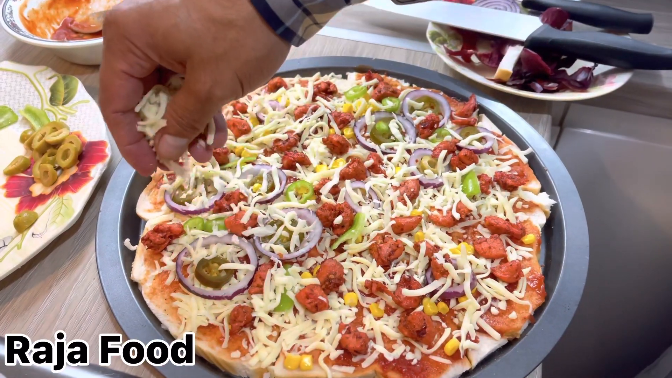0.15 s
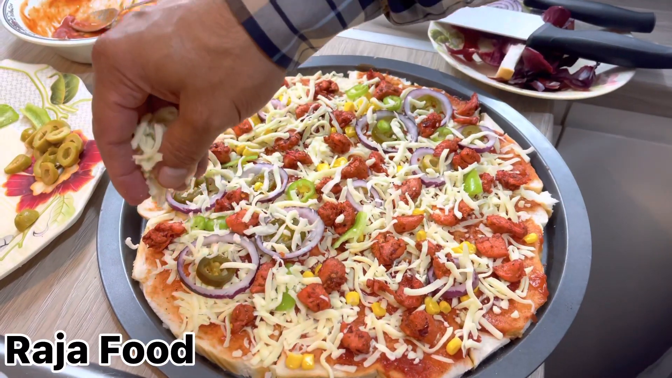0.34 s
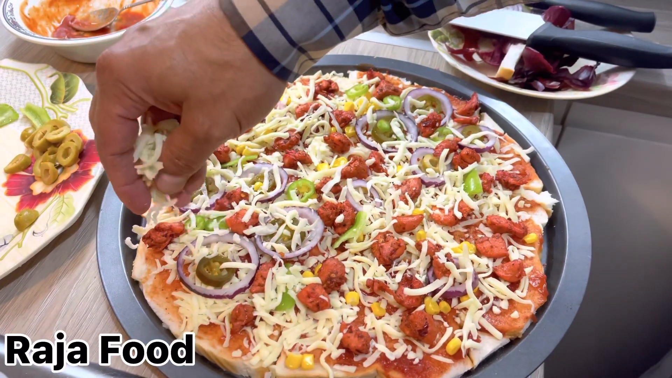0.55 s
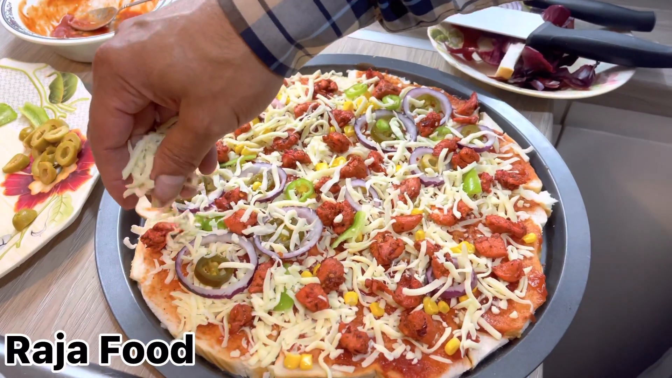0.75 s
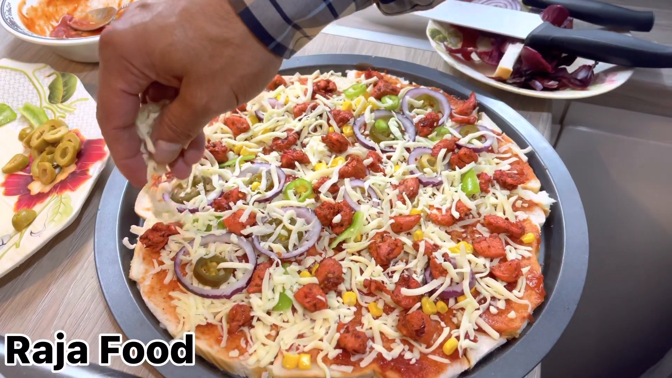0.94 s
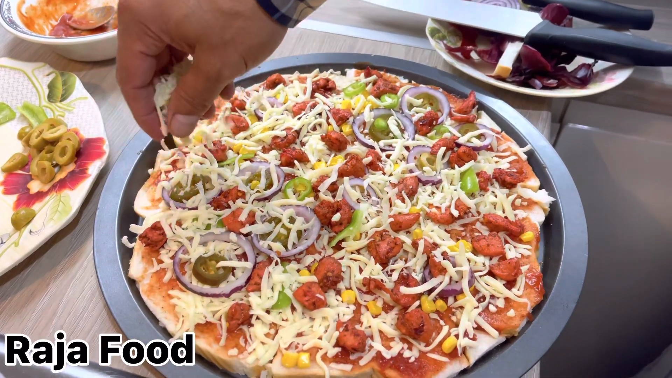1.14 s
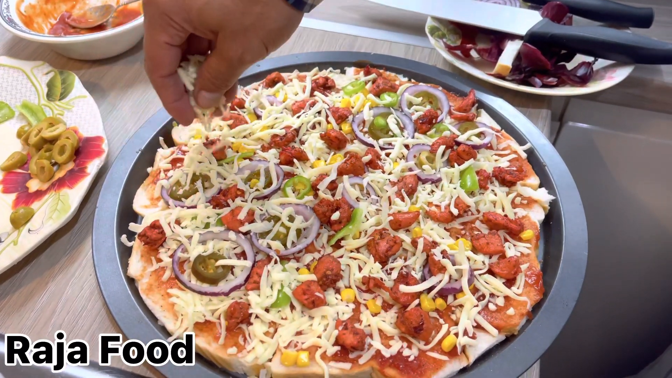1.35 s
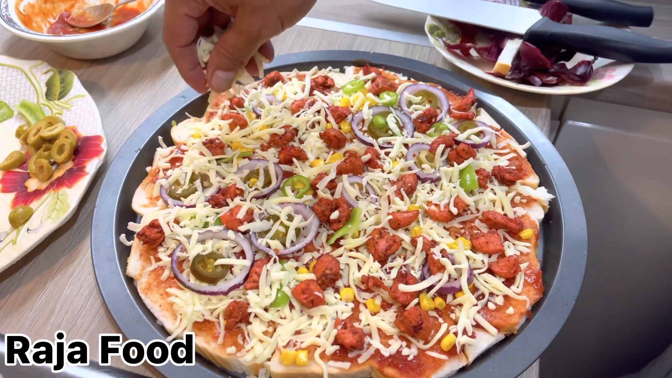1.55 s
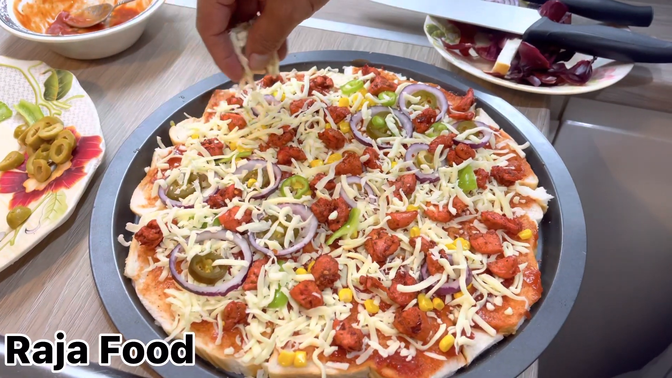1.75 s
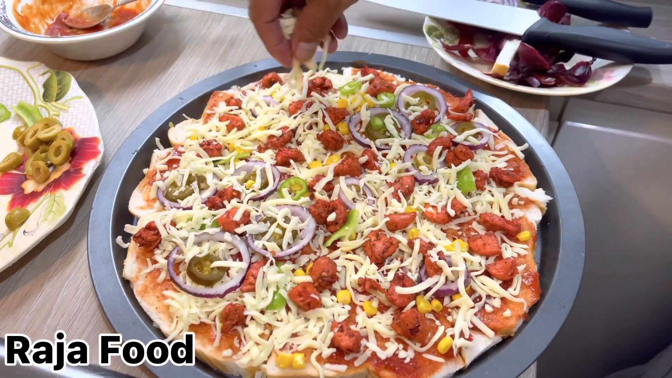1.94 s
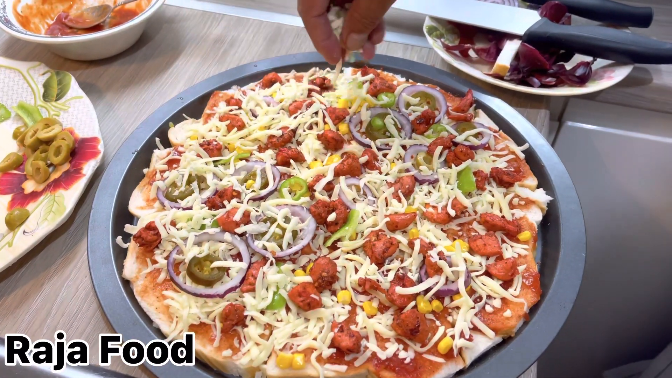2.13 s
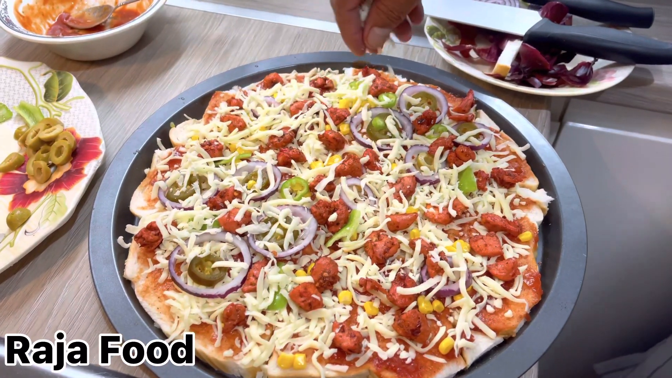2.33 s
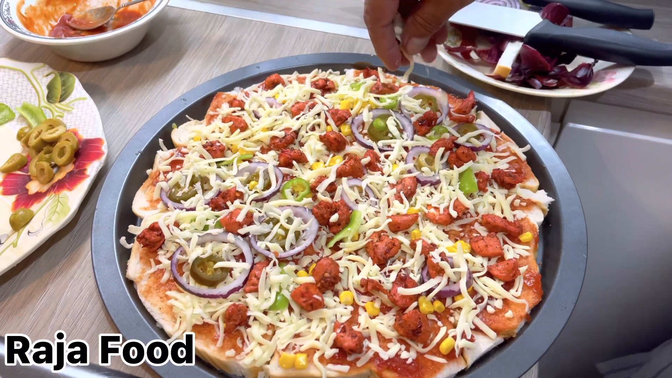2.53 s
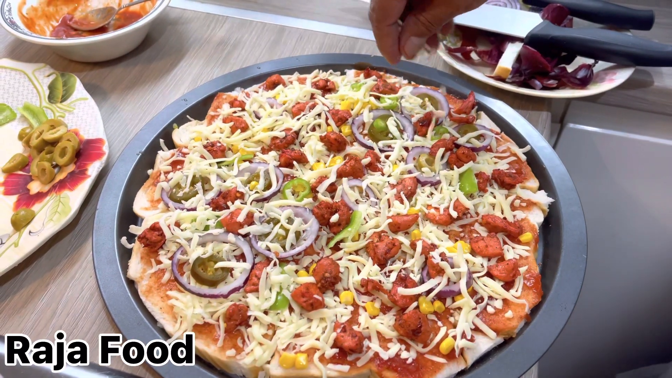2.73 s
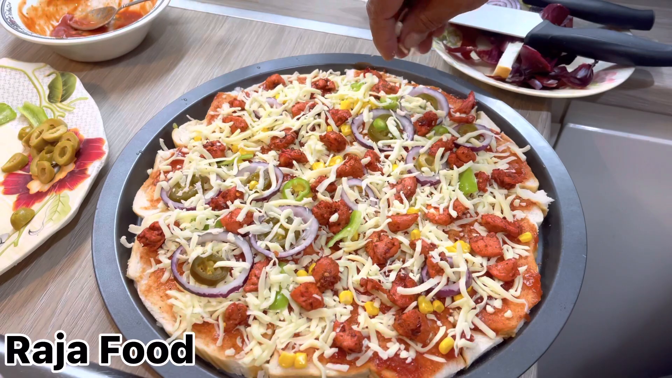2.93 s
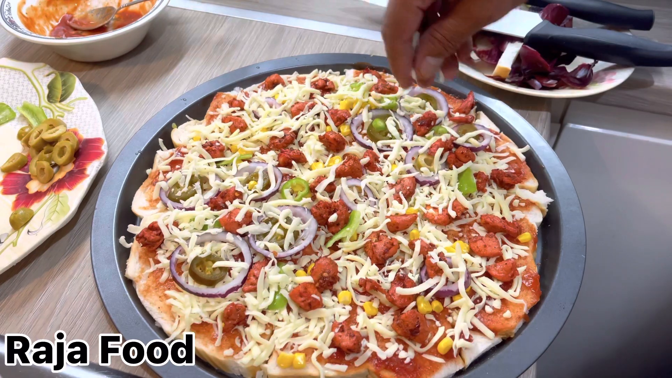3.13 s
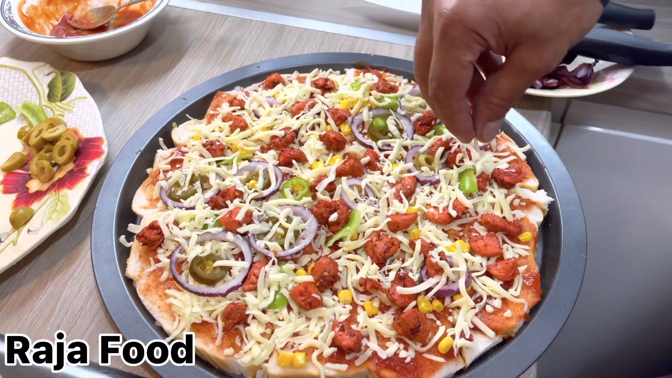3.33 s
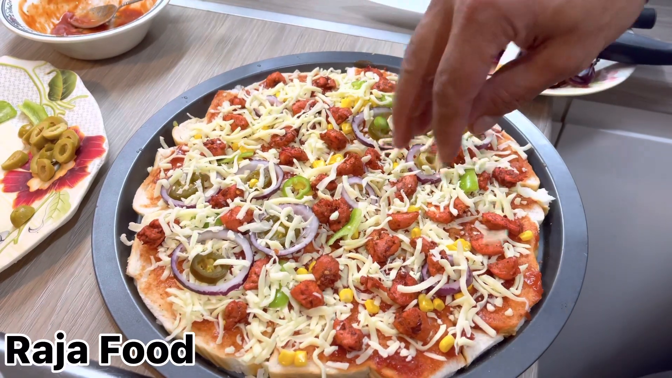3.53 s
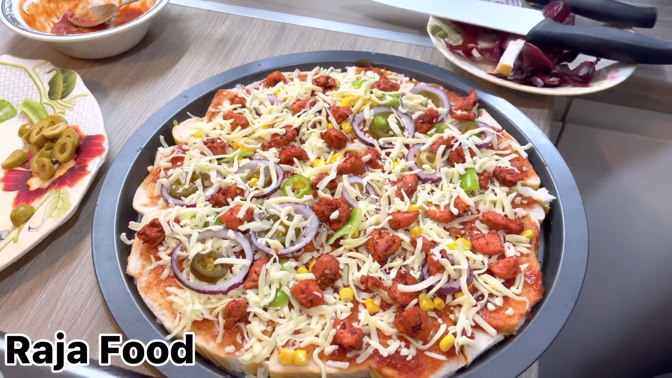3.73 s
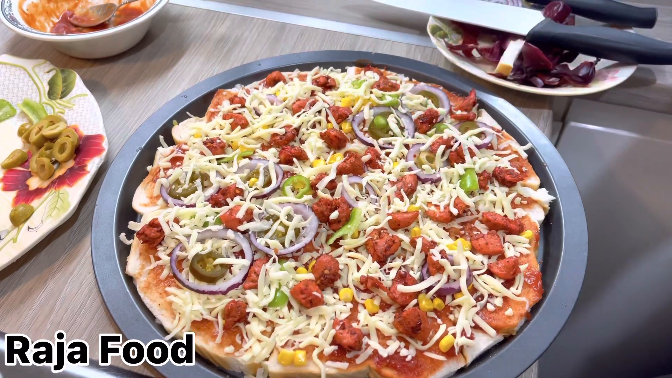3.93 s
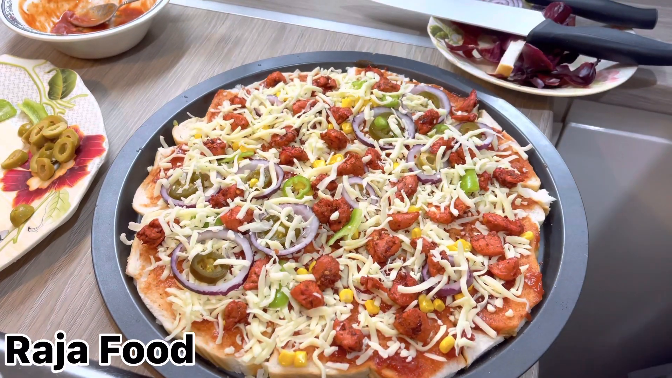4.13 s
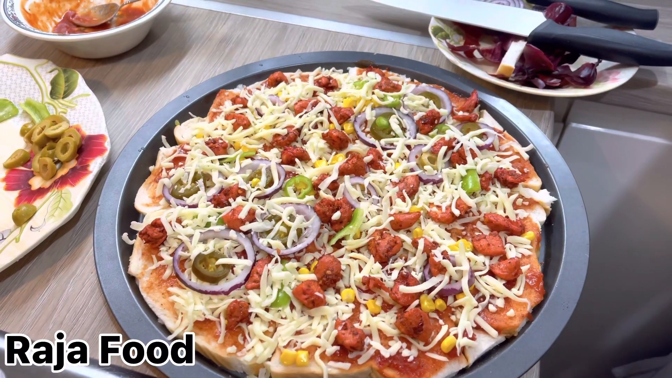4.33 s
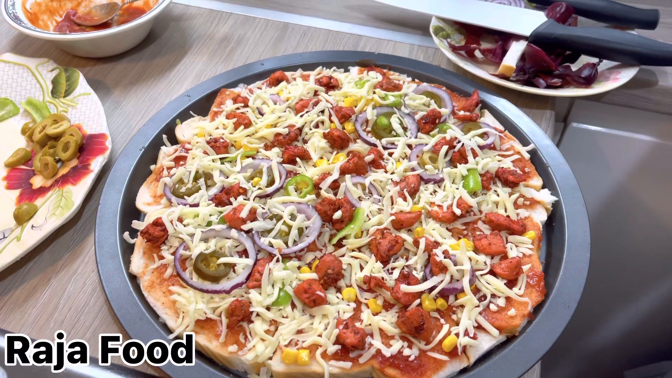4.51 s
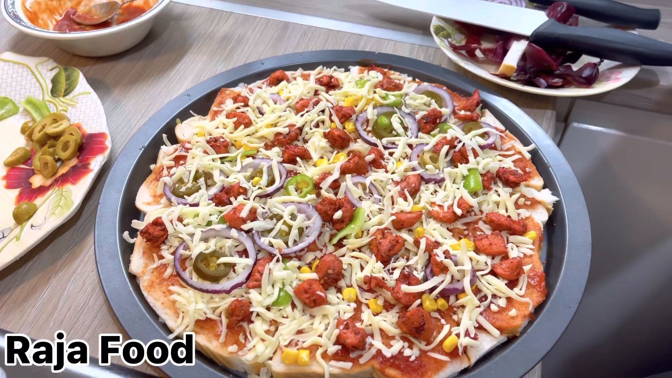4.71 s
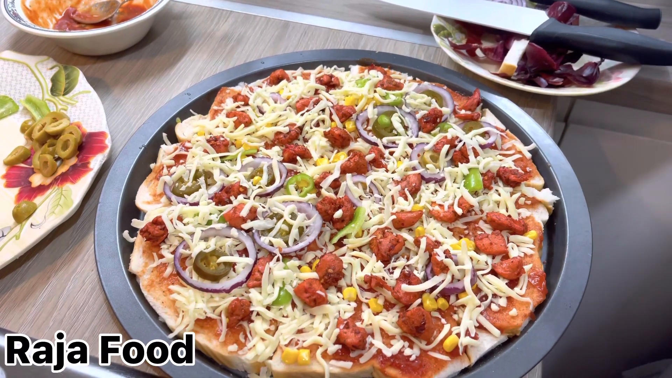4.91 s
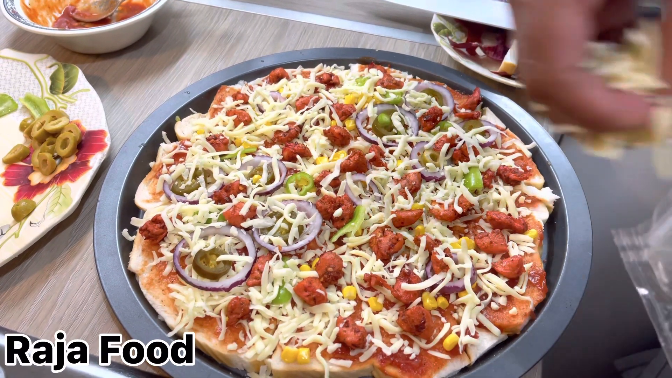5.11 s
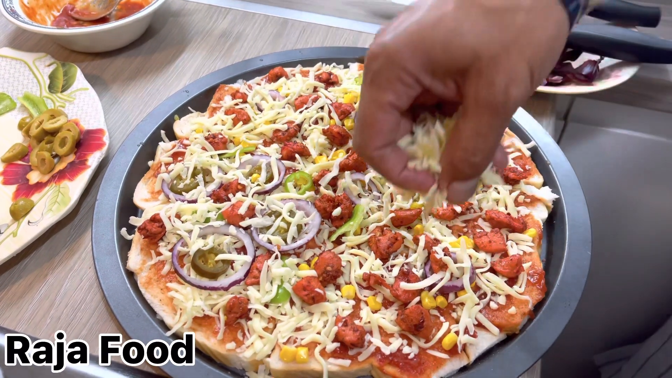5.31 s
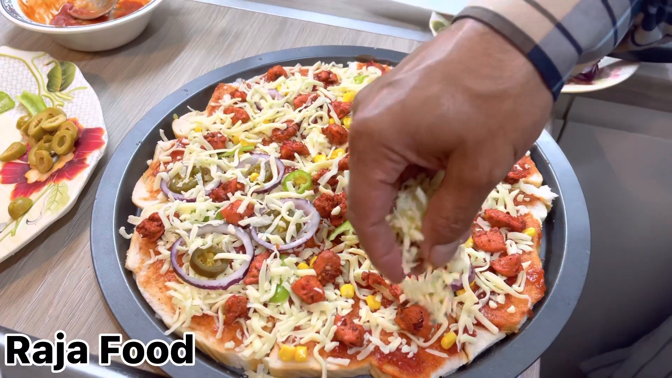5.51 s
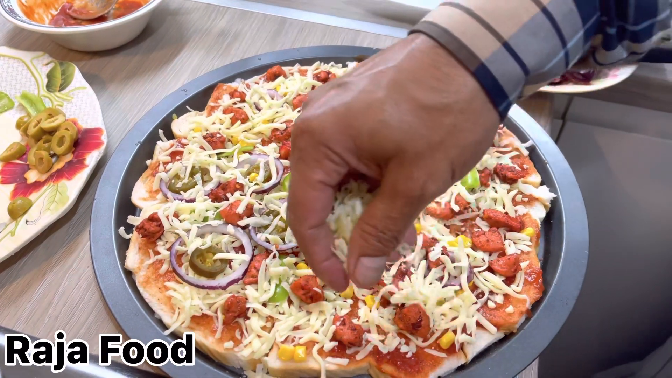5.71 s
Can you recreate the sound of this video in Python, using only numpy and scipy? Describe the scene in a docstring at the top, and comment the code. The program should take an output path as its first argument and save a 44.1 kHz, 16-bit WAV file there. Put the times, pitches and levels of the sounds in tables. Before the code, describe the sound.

Nearly quiet at first: low mains-like hum, faint skin friction, tiny sticky ticks and small dull pats of cheese on toppings. Just before four seconds a crisp plastic bag erupts close by, crackling and snapping with shifting cheese inside and soft bumps beneath, strongest at the start and thinning later. It stops abruptly, leaving a soft cloth rustle and a last small pat. Short indoor reflections, near stereo microphones.

```python
"""In a small kitchen where a fridge hums, grated cheese is scattered over a pizza.
Clumps pat softly onto the toppings: filtered bursts of clicks excite resonances of the loaded tray.
The hand digs into a crinkling plastic bag, where many ringing clicks make the film and shifting cheese,
and comes back with a faint swish of sleeve, made of fine-grained friction noise.
A close pair of microphone ports hears it, with room reflections, over hum and room noise."""
import sys
import numpy as np
from scipy import signal
from scipy.fft import rfft, irfft
from scipy.io import wavfile

SR = 44100
rng = np.random.default_rng(int(sys.argv[2]) if len(sys.argv) > 2 else 0)


def generate_wav(signal):
    """Clip the signal to [-1, 1] and save it as 16-bit WAV at the path in sys.argv[1]."""
    frames = np.transpose(np.atleast_2d(signal))
    scaled = np.clip(frames, -1, 1) * 32767
    pcm = np.round(scaled).astype(np.int16)
    wavfile.write(sys.argv[1], SR, pcm)


N = 258426
TIME, HZ = np.arange(N) / SR, np.fft.rfftfreq(N, 1 / SR)  # [s], [Hz]

# Phase between the ports: (frequency [Hz], lead of the left port [rad])
PORT_PHASE = [(0, 0), (300, -.3), (700, -2.35), (1500, -2.4), (2840, -2.9), (4480, -6.1), (5200, -9),
              (6300, -5.9), (8100, -5.9), (9040, -7.4), (10200, -9.4), (11800, -12), (16000, -12.6)]
# Spectrum of crinkling film: (frequency [Hz], relative density [dB per Hz])
FILM_SPECTRUM = [(500, -20), (1200, -3), (2300, -1), (4600, -1), (6500, -3), (9000, -5), (11500, -2),
                 (12600, -12), (14000, -36)]


def pats(pat_db=0, tick_db=0):
    """Impact and adhesion: moist clumps knock the resonant tray; sticky shreds part with a crisp tick."""
    # Clumps landing:
    # (time [s], attack level [dB], tilt [dB/octave], decay constant [s], main click amplitude [0-1])
    landings = [(1.459, -53.5, -0.5, 0.014, 0.34), (1.473, -46.5, 1, 0.0057, 0.92),
                (1.489, -42.5, 3.5, 0.0036, 0.67), (1.8222, -45, -0.5, 0.0035, 0.67),
                (1.832, -54, -2.5, .006, 0.2), (2.596, -54, -6, 0.0047, .3), (3.292, -59, -6.5, .016, .1),
                (5.816, -51.5, 5, 0.0033, 0.57)]
    # Spectrum of a pat: (frequency [Hz], relative density [dB per Hz])
    pat_spectrum = [(120, -15), (330, -3), (520, -3.5), (750, -0.5), (1050, 0), (1500, -9.5), (2200, -7),
                    (3100, -19.5), (4300, -23.5), (9000, -46)]
    # Resonances of the loaded tray: (frequency [Hz], width [Hz], height [dB])
    tray_resonances = [(312, 39, 5.5), (440, 110, 1), (630, 80, 6.5), (815, 110, -3.5), (990, 68, 4),
                       (1190, 74, -3.5), (1396, 45, 7), (1670, 90, 4.5), (2000, 96, 4), (2280, 110, -0.5),
                       (2880, 170, 1)]
    # Sticky shreds and fingers parting:
    # (time [s], attack level [dB], tilt [dB/octave], decay constant [s])
    partings = [(0.447, -75.5, 4, .002), (.979, -73, -1.5, 0.0022), (1.4737, -61, -7, 0.0033),
                (1.488, -36.5, 0, 0.0015), (1.491, -62, 17, 0.00088), (1.8219, -51.5, -0.5, 0.0082),
                (2.402, -68, 18, 0.002), (2.44, -62, -1, 0.0036), (2.51, -67.5, 9, 0.0014),
                (3.07, -62, -4.5, 0.0023), (3.170, -66.5, -4.5, 0.0027), (3.627, -62.5, 5, .0014)]
    # Spectrum of a tick: (frequency [Hz], relative density [dB per Hz])
    tick_spectrum = [(300, -20), (900, 0), (2100, -1), (3000, -3.5), (4300, -3), (6000, 1.5), (8500, -2.5),
                     (11800, 0.5), (14000, -22.5)]

    knocks, ticks = np.zeros((2, N))
    for s, db, brightness, decay, hardness in landings:
        impact = burst(decay, length=4096, main_click=hardness)
        knock = colour(impact, tilted(pat_spectrum, brightness))
        add(knocks, s, struck(knock, db + pat_db))
    for s, db, brightness, decay in partings:
        release = burst(decay, length=4096, main_click=0.414)
        tick = colour(release, tilted(tick_spectrum, brightness))
        add(ticks, s, struck(tick, db + tick_db))
    return ringing(knocks, tray_resonances) + ticks


def rubs(rub_db=-1, arch_power=1.0, flutter_db=2.0, wander_db_per_octave=2.5):
    """Sliding friction: skin and cloth give fine grains whose duller and brighter parts flutter apart."""
    # Fingers rubbing off shreds, and the sleeve sliding:
    # (middle time [s], length [s], level before the arch [dB], mean tilt [dB/octave])
    strokes = [(0.67, .44, -70, -9), (2.532, 0.35, -72.5, 0), (2.717, 0.11, -68, -3.5),
               (2.804, 0.11, -70, -10.5), (3.22, 0.16, -65.5, -12), (3.598, 0.103, -63.5, -7),
               (3.74, 0.2, -68, 4.5), (5.157, .16, -68.5, -2), (5.366, 0.37, -67.5, 3),
               (5.564, 0.45, -69, 1.5)]
    # Spectrum of sliding skin and cloth: (frequency [Hz], relative density [dB per Hz])
    friction_spectrum = [(600, -5), (1500, 2), (4500, -5), (8000, -8.5), (11500, -17), (13500, -28)]

    out = np.zeros(N)
    for side in (-1, 1):  # duller contact, then brighter contact
        grain = grains(per_s=4600, spread_db=5.0) * gain_of(flutter_db * drift(18))
        for middle, length, db, brightness in strokes:
            start = max(middle - length / 2, 0)
            contact = grain[round(start * SR):][:round(length * SR)]
            spectrum = tilted(friction_spectrum, brightness + side * wander_db_per_octave)
            fizz = evened(colour(contact, spectrum))
            arch = (1 - np.linspace(-1, 1, len(fizz)) ** 2) ** arch_power
            add(out, start, gain_of(db + rub_db) * arch * fizz)
    return out / np.sqrt(2)


def digging(crinkle_db=-2.0, shuffle_db=-2.0, clump_db=2, crackle_db=-4.0, crackles_per_s=140):
    """Crackling noise: creases of many sizes click and ring in thin film while cheese shifts inside."""
    # Spectrum of shifting cheese: (frequency [Hz], relative density [dB per Hz])
    cheese_spectrum = [(50, -22), (135, -4), (190, -9), (285, -3), (380, -4), (500, -7), (620, -5),
                       (850, -3), (1080, -2), (1400, -11), (2500, -30)]

    film_level, cheese_level, tilt = grip()
    clumping_db = clump_db * drift(80)
    film = 0
    for hz in np.geomspace(1000, 12000, num=18):
        # each crease size rings at its own pitch; the small ones are many
        crease = [(hz / 2, -28), (hz / 1.15, -10), (hz, 0), (hz * 1.15, -10), (hz * 2, -28)]
        clicks = grains(per_s=110 * (hz / 2000) ** 1.2, spread_db=3.5)
        clicks = clicks * gain_of(clumping_db + 2.6 * drift(35))
        film = film + colour(clicks * gain_of(tilt * np.log2(hz / 4000)), crease)
    film = evened(colour(film, FILM_SPECTRUM))
    cheese = grains(per_s=450, spread_db=3) * gain_of(clumping_db)
    cheese = evened(colour(cheese, cheese_spectrum))
    # single creases give sharp, broadband clicks over the fizz
    crackle = evened(colour(grains(per_s=crackles_per_s, spread_db=1), FILM_SPECTRUM))
    crackle_gain = gain_of(crackle_db + np.minimum(tilt, 0) / 2)
    plastic = film * gain_of(crinkle_db) + crackle * crackle_gain
    return plastic * film_level + cheese * cheese_level * gain_of(shuffle_db)


def grip(attack_s=0.035, release_db_per_s=150, leave_s=0.0043):
    """Power summation of grabs that tighten, hold and let go: film level, cheese level and tilt."""
    # The hand in the bag: (entry time [s], exit time [s])
    bag_visit = (3.85, 5.11)
    # Grabs at the cheese:
    # (start time [s], hold from the start [s], level [dB], tilt [dB/octave], cheese relative to film [dB])
    grabs = [(3.832, 0.16, -45, 2, 1.5), (3.931, 0.18, -36, -0.2, -5), (4.08, 0.13, -47, -4.5, 3.5),
             (4.245, 0.14, -57.5, -16, -1.5), (4.335, 0.11, -45.5, -4, 0.5), (4.481, 0.061, -45.5, -4, 1.5),
             (4.607, 0.071, -50.5, -6, -2.5), (4.76, .09, -57.5, -2.5, -13), (4.863, 0.076, -43.5, 0, -5.5),
             (4.961, 0.034, -46, 9, -6)]
    resting_film_db, resting_cheese_db = -56.5, -54.5  # how much each stirs between grabs

    enter, leave = bag_visit
    film, cheese, tilt = gain_of(resting_film_db) ** 2, gain_of(resting_cheese_db) ** 2, 0
    for start, hold, db, brightness, weight_db in grabs:
        attack = np.clip((TIME - start) / attack_s, 0, 1)
        release_db = release_db_per_s * np.maximum(TIME - start - hold, 0)
        power = (attack * gain_of(db - release_db)) ** 2
        film = film + power
        cheese = cheese + power * gain_of(weight_db) ** 2
        tilt = tilt + brightness * power
    inside = (TIME > enter) * np.exp(-np.maximum(TIME - leave, 0) / leave_s)
    return np.sqrt(film) * inside, np.sqrt(cheese) * inside, tilt / film


def folding(x, patchy_db=2.0, patch_hz=280, patch_s=0.038):
    """Time-varying resonance: the bag keeps changing shape, so short-lived peaks come and go."""
    hz, t, z = signal.stft(x, SR, nperseg=1024, noverlap=768)
    # smooth noise over frequency and time
    along_hz = np.exp(-(np.fft.fftfreq(len(hz), hz[1]) * patch_hz * 2) ** 2)
    along_s = np.exp(-(np.fft.fftfreq(len(t), t[1]) * patch_s * 2) ** 2)
    noise = np.fft.fft2(rng.standard_normal(z.shape))
    patches = evened(np.fft.ifft2(noise * np.outer(along_hz, along_s)).real)
    shaped = z * evened(gain_of(patchy_db * patches))
    return signal.istft(shaped, SR, nperseg=1024, noverlap=768)[1][:N]


def snaps(snap_db=-0.93, ring_octaves=0.4, top_db=-7.0):
    """Buckling: a crease gives way in a quick run of clicks that ring a patch of film."""
    # Creases snapping:
    # (time [s], attack level [dB], ring frequency [Hz], decay constant [s], ring peak height [dB])
    buckles = [(3.742, -41.5, 3310, 0.0013, 21), (3.8582, -36.5, 5150, 0.0031, 11),
               (3.879, -35.5, 4500, 0.0015, 7), (3.892, -36, 2000, 0.0032, -1),
               (3.934, -30.5, 6370, 0.0029, 10), (3.9708, -43, 4500, 0.00071, 6.5),
               (3.9841, -19.5, 5100, 0.0017, 11.5), (3.988, -19.5, 4300, 0.00063, 9),
               (3.998, -39, 4300, .001, 9.5), (4.027, -33, 5000, .0012, -2), (4.034, -29, 5500, 0.0025, 10),
               (4.05, -26.5, 3520, 0.0023, 6.5), (4.054, -35, 2600, 0.00078, 11.5),
               (4.0809, -24.5, 2750, .0017, 7), (4.1198, -29, 2080, 0.0017, 5),
               (4.1388, -26.5, 4200, 0.0012, 7.5), (4.168, -17, 2250, 0.0012, 11),
               (4.172, -21.5, 4730, 0.0018, 9), (4.182, -28.5, 4350, 0.00086, 18),
               (4.2124, -31.5, 3600, 0.0018, 11), (4.2356, -33, 9100, 0.002, 6),
               (4.3429, -37, 3960, 0.00067, 19), (4.347, -48, 3700, .001, 22),
               (4.3788, -27, 3760, 0.0015, 8.5), (4.418, -29, 2600, 0.00092, -1),
               (4.436, -41, 4000, 0.00048, 17), (4.475, -39.5, 4200, 0.0021, 5),
               (4.51, -39.5, 2500, 0.0027, 11), (4.515, -29, 3520, 0.0016, 6),
               (4.5446, -25.5, 5400, 0.0011, 7.5), (4.6365, -38.5, 4500, 0.00046, -5),
               (4.683, -42.5, 3900, 0.0015, 17), (4.7082, -38.5, 2480, 0.00056, 18),
               (4.884, -56, 2600, 0.0014, 18), (4.9044, -35, 5130, 0.00051, 20),
               (4.931, -32.5, 6750, 0.0012, 7.5), (5.008, -39.5, 1450, 0.0034, 10),
               (5.045, -34.5, 2400, 0.0031, 11.5), (5.053, -34, 1300, 0.002, 29),
               (5.0618, -24.5, 5920, 0.0014, 10), (5.062, -26, 1900, 0.00078, 22),
               (5.0765, -29, 1440, 0.00059, 28), (5.0975, -30, 2500, 0.0002, 26)]
    # a longer run spreads over more film: it is brighter and sends more into the room
    run_s, treble_db_per_doubling, room_db_per_doubling = 0.0017, 9.5, 10.5

    near, send = np.zeros((2, N))
    hz = np.geomspace(100, 20000, num=80)
    for s, db, ring_hz, decay, ring_db in buckles:
        doublings = np.log2(decay / run_s)
        treble_db = top_db + treble_db_per_doubling * doublings
        body = read([(200, -22.0), (900, -5.5), (1700, 2), (4500, -4.5),
                     (8000, treble_db), (12000, treble_db + 8.0), (14500, treble_db - 21.5)], hz)
        ring = ring_db / (1 + (np.log2(hz / ring_hz) / ring_octaves) ** 2)
        clicks = burst(decay, length=2048, main_click=0.56)
        snap = struck(colour(clicks, np.transpose([hz, body + ring])), db + snap_db)
        add(near, s, snap)
        add(send, s, gain_of(room_db_per_doubling * doublings) * snap)
    return near, send


def scrapes(scrape_db=-2.0, slips_per_s=420, q=15):
    """Stick-slip friction: fingers drag along a taut fold and each slip rings it at its own pitch."""
    # Fingers scraping along folds: (start time [s], length [s], ring frequency [Hz], level [dB])
    drags = [(3.848, 0.073, 1550, -50), (3.88, 0.058, 732, -46), (4.049, .06, 3220, -45),
             (4.105, 0.059, 996, -39), (4.202, 0.032, 1970, -46.5), (4.298, 0.084, 2865, -54.5),
             (4.402, .045, 840, -49), (4.493, 0.049, 816, -43.5), (4.538, 0.031, 2980, -53),
             (4.704, .05, 1740, -57), (4.87, 0.074, 1530, -51.5), (4.989, 0.14, 1574, -57)]

    out, slips = np.zeros(N), grains(per_s=slips_per_s, spread_db=1.5)
    for start, length, hz, db in drags:
        drag = slips[round(start * SR):][:round(length * SR)]
        # padding leaves time for the ring to die
        drag = np.pad(drag * signal.windows.tukey(len(drag)), (0, SR // 10))
        ring = signal.lfilter(*signal.iirpeak(hz, q, SR), drag)
        rms = np.sqrt(np.sum(ring ** 2) / (length * SR))
        add(out, start, gain_of(db + scrape_db) * ring / rms)
    return out


def bumps(bump_db=0, push_s=0.00051):
    """Modal excitation: soft blows of the bag ring the damped modes of the counter."""
    # The bag knocking on the counter: (time [s], peak level [dB])
    blows = [(3.972, -22.5), (3.984, -23), (3.989, -15.5), (4.381, -37.5), (4.417, -35.5), (4.516, -35),
             (4.927, -32), (5.006, -36.5), (5.079, -37)]
    # Counter modes: (frequency [Hz], relative level [dB], 60 dB decay time [s])
    counter_modes = [(74, -7, 0.063), (141, 1.5, 0.065), (286.7, 3.5, 0.061), (355, 2.5, 0.042),
                     (485, 4.5, 0.049), (680, 3, 0.03), (732, 2, 0.04), (954, 0.5, 0.12),
                     (995, -6.5, 0.075)]

    out, t = np.zeros(N), np.arange(SR // 3) / SR
    knock = 0
    for hz, db, t60 in counter_modes:
        knock = knock + gain_of(db - 60 * t / t60) * np.sin(2 * np.pi * hz * t)
    knock = knock * (1 - np.exp(-t / push_s))
    for s, db in blows:
        add(out, s, gain_of(db + bump_db) * knock / abs(knock).max())
    return out


def ports(x, obliqueness=1):
    """Phase difference: direct sound reaches two ports out of step, the more so further off axis."""
    right = rfft(x) * np.exp(-1j * obliqueness * read(PORT_PHASE, HZ))
    return np.array([x, irfft(right, N)])


def in_kitchen(direct, send):
    """Superposition: the direct sound at both ports, with the room's reply to the part sent into it."""
    # Balance of sound from the counter: (frequency [Hz], left minus right [dB])
    port_balance = [(60, -6), (250, -8), (700, -4), (1300, -0.5), (2400, -8), (4400, 2.5), (8000, 0)]

    # three room replies fade into each other in turn, so no single colouring stands out
    paths = [send * np.sqrt(2 / 3) * np.cos(np.pi * (4 * TIME + k / 3)) for k in range(3)]
    replies = [sum(signal.oaconvolve(path, tail())[:N] for path in paths) for port in direct]
    room = widened(*replies)
    lean = read(port_balance, HZ) / 2
    return irfft(rfft(direct + room) * gain_of([lean, -lean]), N)


def tail(early_db=-7, early_s=0.008):
    """Reverberation: echoes off counter and dishes, and dense reflections that decay band by band."""
    # Decay of the kitchen: (frequency [Hz], 60 dB decay time [s])
    room_decay = [(150, 0.32), (600, 0.27), (2500, 0.19), (7000, 0.12), (14000, 0.11)]

    hz, t, z = signal.stft(rng.standard_normal(SR // 2), SR, nperseg=256)
    decay = gain_of(-60 * t / read(room_decay, hz)[:, None])
    taps = signal.istft(z * decay, SR, nperseg=256)[1]
    taps *= np.minimum(np.arange(len(taps)) / SR / 0.00061, 1) ** 2  # onset over 0.61 ms
    taps /= np.linalg.norm(taps)
    echoes = (SR * early_s * rng.uniform(.1, 1, size=4)).astype(int)
    taps[echoes] += gain_of(early_db) * rng.choice([-1, 1], size=4) / 2
    return taps / np.linalg.norm(taps)


def widened(a, b):
    """Partial correlation: two unrelated sounds are mixed into a left and a right of set likeness."""
    # Likeness of the two channels, wide below and nearly one sound above 9.9 kHz:
    # (frequency [Hz], likeness [0-1])
    channel_likeness = [(60, 0), (130, 0.3), (290, 0.4), (640, 0.11), (3000, 0), (8400, 0.05), (9900, 1),
                        (11000, 0.92), (12000, 0.7), (16000, .9)]

    same = np.clip(read(channel_likeness, HZ), 0, 1)
    right = same * rfft(a) + np.sqrt(1 - same ** 2) * rfft(b)
    right = right * np.exp(-1j * read(PORT_PHASE, HZ))
    return np.array([a, irfft(right, N)])


def fridge(waver_db=0.38, wander=0.041, lean_db=0.7, whine_wander=1.0):
    """Additive synthesis: motor and mains lines with a thin whine, all wavering (wanders in rad)."""
    # Motor and mains lines: (mean frequency [Hz], mean level before the port lean [dB rms])
    hum_lines = [(49.4, -54), (99.93, -45.5), (132.7, -68), (299.5, -76), (399.4, -77)]
    whine_hz, whine_db = 730, -71.5

    hum = 0
    for hz, db in hum_lines:
        level = gain_of(db + waver_db * drift(2))
        phase = 2 * np.pi * (hz * TIME + rng.random()) + wander * drift(3.4)
        hum = hum + level * np.sin(phase)
    whine_phase = 2 * np.pi * whine_hz * TIME + whine_wander * drift(0.83)
    whine = gain_of(whine_db + 2.5 * drift(17.0)) * np.sin(whine_phase)
    return np.sqrt(2) * (hum + whine) * gain_of([[-lean_db], [lean_db]])


def air(air_db=0.66, rumble_db=-60, swell_db=0.04):
    """Filtered noise: steady room noise over a low rumble, spread over the two channels."""
    # Spectrum of the room noise: (frequency [Hz], relative density [dB per Hz])
    air_spectrum = [(120, -11), (190, -6), (300, -3.5), (480, -8), (720, -9.5), (1100, -15.5),
                    (2400, -21.5), (3300, -37), (4500, -38), (8000, -41), (11500, -40), (13500, -50.5)]
    # Spectrum of the low rumble: (frequency [Hz], relative density [dB per Hz])
    rumble_spectrum = [(12, -34.5), (24, -8.5), (36, -23.5), (70, 13), (110, 6.5), (160, 0), (240, -48)]

    noises = []
    for _ in range(2):
        hiss = evened(colour(rng.standard_normal(N), air_spectrum))
        rumble = evened(colour(rng.standard_normal(N), rumble_spectrum))
        noises.append(gain_of(-62 + air_db) * hiss + gain_of(rumble_db) * rumble)
    return widened(*noises) * gain_of(swell_db * drift(2.7))


def burst(decay, length, main_click):
    """Spectral whitening: a main click and a dying run of smaller ones, with no pitch of its own."""
    run = rng.standard_normal(length) * np.exp(-np.arange(length) / SR / max(decay, 1e-4))
    run /= np.linalg.norm(run)
    run[0] = main_click
    for _ in range(4):  # flatten the spectrum, keep the phase, trim to length
        run = irfft(np.exp(1j * np.angle(rfft(run, 2 * length))))[:length]
    return run


def struck(sound, db):
    """Attack level: sets the rms of the first 3 ms."""
    return gain_of(db) * sound / np.sqrt(np.mean(sound[:132] ** 2))


def grains(per_s, spread_db):
    """Poisson-like impulses: random clicks, mostly small and a few large, of rms 1."""
    size = gain_of(spread_db * np.minimum(rng.exponential(1, N), 4))
    return evened(size * rng.choice([-1, 1], N) * (rng.random(N) < per_s / SR))


def ringing(x, resonances):
    """Resonance: lifts narrow peaks and sinks narrow valleys, so that a sound rings at the peaks."""
    hz = np.linspace(0, SR / 2, num=2049)
    db = sum(height / (1 + (2 * (hz - centre) / width) ** 2) for centre, width, height in resonances)
    return colour(x, np.transpose([hz, db]))


def colour(x, spectrum):
    """Minimum-phase filtering: a causal filter with the given spectrum keeps clicks sharp in front."""
    db = np.maximum(read(spectrum, abs(np.fft.fftfreq(4096, 1 / SR))), -100)
    log_gain = np.log(gain_of(db))
    taps = np.fft.ifft(np.exp(np.conj(signal.hilbert(log_gain)))).real
    return signal.oaconvolve(x, taps[:len(taps) // 2])[:len(x)]


def tilted(spectrum, db_per_octave):
    """Spectral tilt: a spectrum made brighter or duller around 1 kHz."""
    return [(hz, db + db_per_octave * np.log2(hz / 1000)) for hz, db in spectrum]


def drift(rate_hz):
    """Low-passed noise: slow chance of rms 1."""
    return evened(irfft(rfft(rng.standard_normal(N)) * np.exp(-(HZ / rate_hz) ** 2), N))


def gain_of(db):
    """Logarithmic level: decibels to amplitude."""
    return 10 ** (np.asarray(db) / 20)


def evened(x):
    """Normalisation: scales to rms 1."""
    return x / np.sqrt(np.mean(x ** 2) + 1e-20)


def read(points, hz):
    """Interpolation: reads a table along log frequency."""
    f, value = np.transpose(points)
    return np.interp(np.log(hz + 1), np.log(f + 1), value)


def add(mix, s, sound):
    """Superposition: adds a sound to the mix at time s."""
    part = mix[round(s * SR):][:len(sound)]
    part += sound[:len(part)]


def scene(dig_room_db=-2, pat_room_db=0.5, bump_room_db=-7, snap_room_db=-3,
          pizza_obliqueness=0.4, pizza_lean_db=1):
    """Superposition of pizza, sleeve and bag, with their reflections, over the hum and room noise."""
    # Resonances of the open bag on the counter: (frequency [Hz], width [Hz], height [dB])
    bag_resonances = [(292, 82, 2.5), (574, 78, -1), (840, 45, 0), (1050, 98, 0.5), (1230, 180, -2),
                      (1555, 33, -3.5), (2180, 300, 1), (2940, 190, 1.5), (3830, 260, -3.5)]

    pizza = pats() + rubs()
    handling = ringing(folding(digging()), bag_resonances) + scrapes()
    cracks, cracks_sent = (ringing(x, bag_resonances) for x in snaps())
    knocks = bumps()
    send = gain_of(dig_room_db) * handling + gain_of(pat_room_db) * pizza
    send += gain_of(bump_room_db) * knocks + gain_of(snap_room_db) * cracks_sent
    direct = ports(handling + knocks + cracks)
    direct += ports(pizza, pizza_obliqueness) * gain_of([[-pizza_lean_db], [pizza_lean_db]])
    return in_kitchen(direct, send) + fridge() + air()


def record(dry):
    """Linear filtering: the top end falls away above 12 kHz, then a bass cut and a steep band limit."""
    # Band edge, where the top end falls away above 12 kHz: (frequency [Hz], level [dB])
    top_end = [(12200, -1), (13200, -16), (14500, -28.5), (16000, -16)]
    bass_cut_hz, edge_hz = 36, 15700

    dry = irfft(rfft(dry) * gain_of(read(top_end, HZ)), N)
    dry = signal.sosfilt(signal.butter(4, bass_cut_hz, "high", fs=SR, output="sos"), dry)
    band_limit = signal.firwin(511, edge_hz, window=("kaiser", 9), fs=SR)
    return signal.oaconvolve(dry, band_limit[None], "same")


dry = scene()
out = record(dry)
generate_wav(out)
```